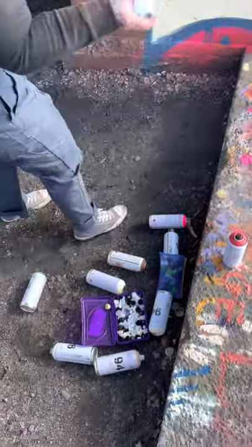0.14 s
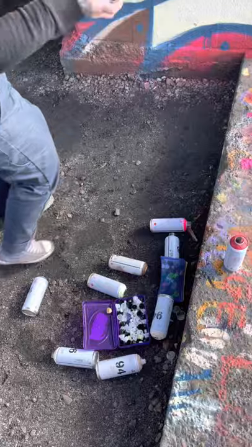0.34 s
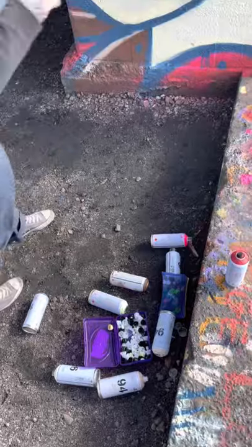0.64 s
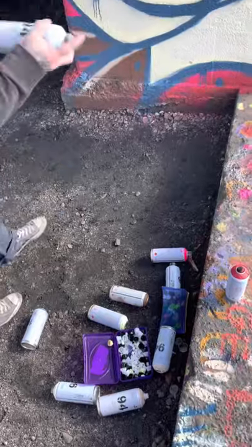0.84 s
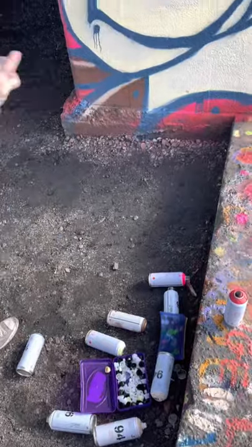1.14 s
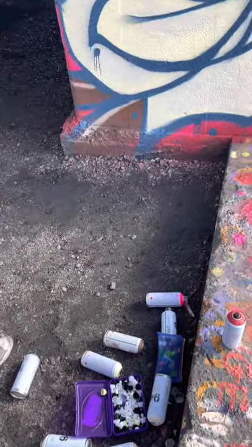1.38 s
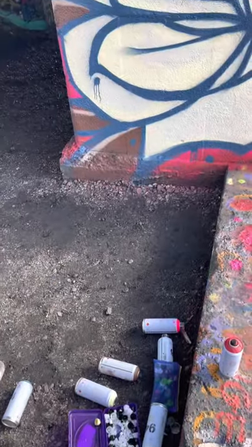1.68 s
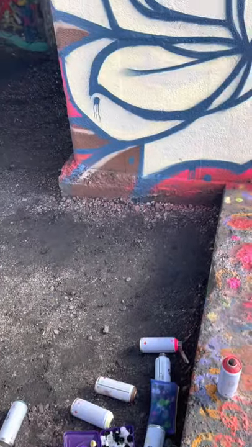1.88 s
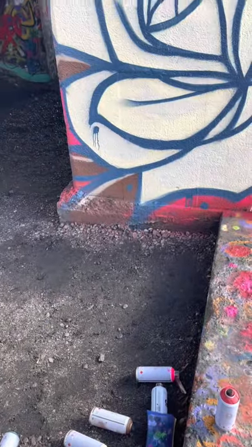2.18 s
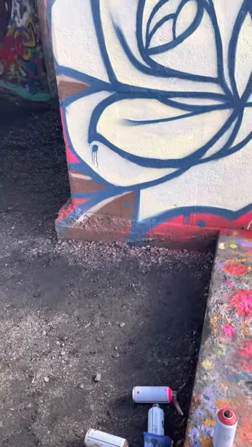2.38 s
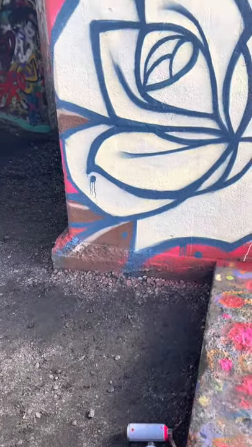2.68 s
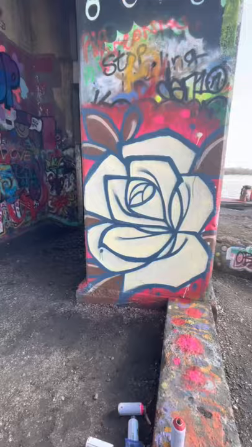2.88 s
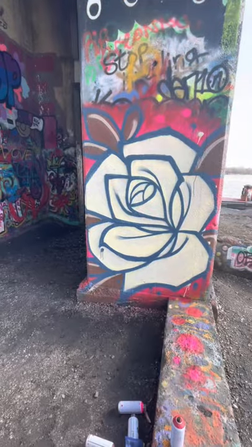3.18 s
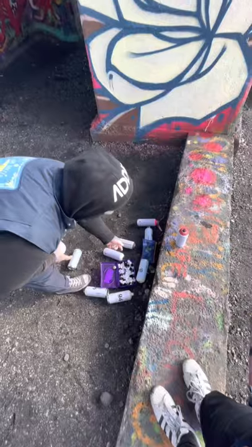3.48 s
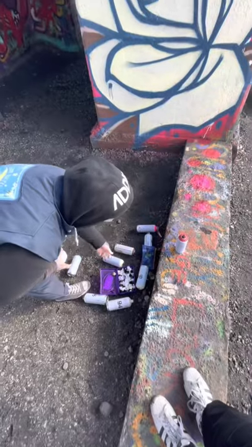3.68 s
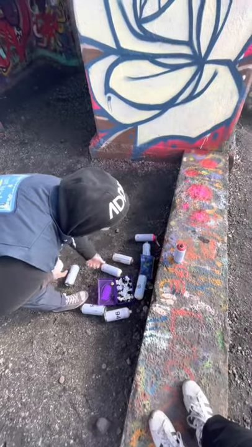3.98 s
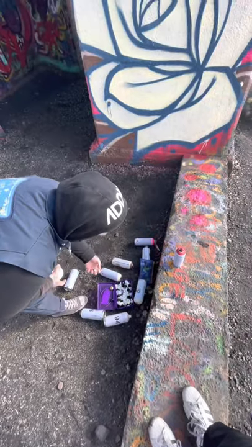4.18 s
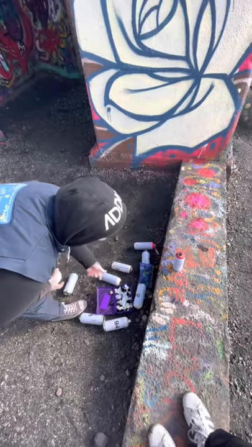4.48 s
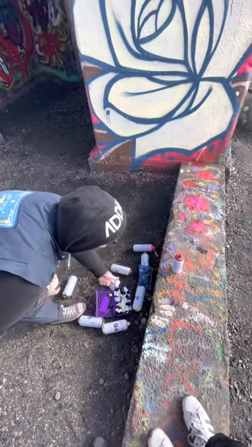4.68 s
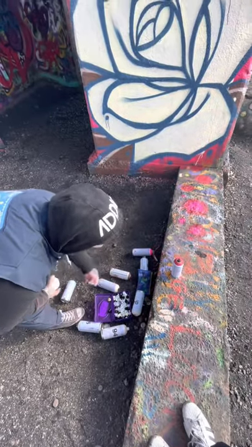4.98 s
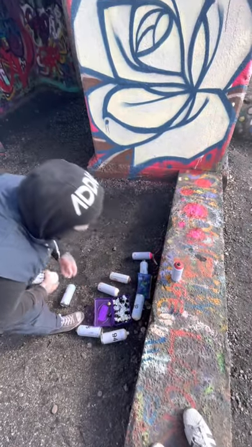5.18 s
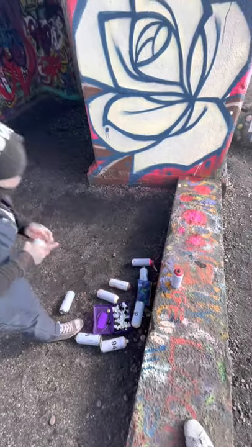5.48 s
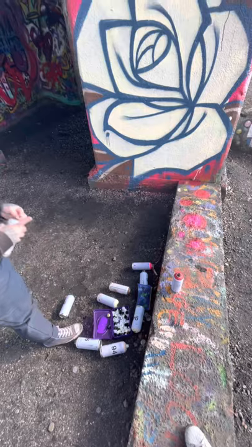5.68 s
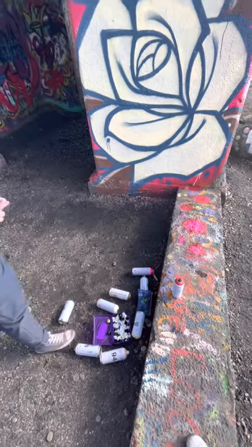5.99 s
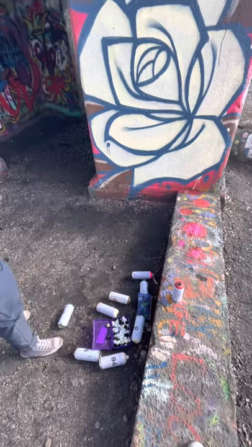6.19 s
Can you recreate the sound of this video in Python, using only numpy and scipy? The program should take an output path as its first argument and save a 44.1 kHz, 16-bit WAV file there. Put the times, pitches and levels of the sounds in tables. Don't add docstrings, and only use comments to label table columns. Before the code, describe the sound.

From 0 to about 2.85 s a steel paint can is shaken hard: its mixing ball hits the shell in sharp, bright, irregular clicks, often in tight clusters of two to five, densest up to about 1.2 s and looser after 2.2 s. Each hit is very short, with a grainy echo from concrete around it. Wind puffs and pops over the phone's stereo microphones. The sound dips and cuts at 2.87 s to quiet wind, thin hiss and distant town hum. A second cut at 3.39 s opens on a clatter of cans and caps, with hollow thuds and short rings near 3.45 and 3.56 s. Sparse ticks follow, with firmer knocks around 4.79 s, and small clusters near 5.8 and 5.9 s. Faint gravel scuffs flicker beneath. Wind grows brisker, with strong pops near 4.1, 5.15 and 5.4 s, continuing to the end at 6.3 s. Bass is thin.

```python
import sys
import numpy as np
from scipy import signal
from scipy.fft import rfft, irfft
from scipy.io import wavfile
from scipy.ndimage import uniform_filter1d

SR = 44100
rng = np.random.default_rng(int(sys.argv[2]) if len(sys.argv) > 2 else 0)


def wav_record(signal):
    frames = np.transpose(np.atleast_2d(signal))
    bounded = np.clip(frames, -1, 1)
    quanta = np.round(bounded * 32767).astype(np.int16)
    wavfile.write(sys.argv[1], SR, quanta)


def volts_from_decibels(level):
    exponent = np.asarray(level, float) / 20
    return 10 ** exponent


N = 279594
T = np.arange(N) / SR
PATCHY_DB, PATCHES_PER_S = 2, 30


def curve(table, column=1):
    return np.interp(T, [r[0] for r in table], [r[column] for r in table])


def colour(x, points):
    hz, db = np.transpose(points)
    f = np.arange(N // 2 + 1) * SR / N + 1
    return irfft(rfft(x) * volts_from_decibels(np.interp(np.log(f), np.log(hz), db)), N)


def unit(x):
    return x / np.sqrt(np.mean(x ** 2))


def walk(rate):
    hold = int(SR / rate)
    steps = np.repeat(rng.standard_normal(N // hold + 1), hold)
    return unit(uniform_filter1d(uniform_filter1d(steps, hold), hold)[:N])


def add(out, s, db, hz, length, turn):
    k = np.arange(-192, 192)
    t = k / SR
    bell = np.exp(-.5 * (t / length[:, None]) ** 2)
    wave = volts_from_decibels(db)[:, None] * bell * np.cos(2 * np.pi * (hz[:, None] * t + turn[:, None]))
    np.add.at(out, np.clip((s * SR).astype(int)[:, None] + k, 0, N - 1), wave)


def placed(s, db, place):
    fall_db = 9
    away = 1 - np.cos(2 * np.pi * (place[:, None] - np.arange(3)) / 3)
    return np.c_[s, db[:, None] - fall_db * away]


# start in seconds, dome, wall and ball level in dB, wall pitch in Hz.
STROKES = [(0.1337, -21, -10, -6.5, 8000), (0.1517, -12, -14.0, -27, 7200), (0.17, -23.0, -25.5, -21, 5780),
           (0.1767, -22, -9.5, -39.0, 5800), (0.2457, -11.5, -13.5, -11, 7700),
           (0.3136, -5.5, -8.5, -8, 6640), (0.319, -26, -4.5, -24.5, 6040), (0.3258, -8, -20.5, -25, 5920),
           (0.3566, -14, -5, -4, 6050), (0.362, -10.5, 0, -18.0, 6500), (0.4641, -11.5, -10, -2.5, 7840),
           (0.4687, -39, -29, -16, 7620), (0.5438, -12, -8.5, -3, 6250), (0.547, -15, -6.5, -8.5, 6040),
           (0.551, -13.5, -12, -30, 7330), (0.6682, -11, -26, -9, 8400), (0.6828, -11.5, -19, -5.5, 5820),
           (0.7117, -18, -24, -19.5, 5450), (0.8097, -11, -5, -9, 5100), (0.8155, -21, 0, -8, 5200),
           (0.823, -28.5, -10, -18, 7100), (0.8315, -12, -15, -6.5, 6130), (0.8395, -54, -5.5, -22, 6050),
           (0.9166, -9, -14, -14, 6050), (0.9244, -34.0, -42, -16, 6000), (0.9418, -17, -26.5, -13, 7100),
           (1.0113, -19.5, -14.5, -26, 6220), (1.0569, -10, -3, -19.5, 6790), (1.06, -17, -9.5, -10, 6560),
           (1.0673, -27, -6, -12, 5700), (1.0768, -22, -5, -3, 7350), (1.0852, -56, -6.5, -19, 6300),
           (1.1048, -53, -17.5, -16, 6880), (1.1764, -11.5, -10, -9, 8050), (1.183, -26, -19, -13, 5800),
           (1.184, -37, -31, -18, 7370)]
# start in seconds, dome, wall and ball level in dB, wall pitch in Hz.
LATER_STROKES = [(1.2036, -24, -25.0, -15, 8170), (1.303, -12.5, -19.5, -16, 6510),
                 (1.3141, -26, -3.5, -8.5, 7800), (1.324, -19, -10.5, -15.0, 6200),
                 (1.3419, -22, -20, -20.0, 6300), (1.4239, -17, -13, -12, 7800), (1.4305, -7, -22, -15, 8010),
                 (1.4356, -13, -23, -16, 7760), (1.4808, -18, -20, -20.5, 5570),
                 (1.5345, -14.5, -3.5, -11.5, 8000), (1.5362, -4.5, -6, -21, 5230), (1.545, -26, -14, -17, 6520),
                 (1.5722, -23, -3, -8, 7580), (1.5818, -37, -18, -14.5, 7900), (1.6776, -9.5, -26, -25.0, 6000),
                 (1.6825, -19, -23, -13, 7720), (1.751, -10.5, -12.5, -15, 5600),
                 (1.8517, -21.5, -13, -25, 6210), (1.856, -15, -15.5, -43, 5780), (1.8746, -13, -13, -22, 7630),
                 (1.9566, -20, -17, -13.5, 5670), (1.961, -8, -27, -27, 6950), (1.9867, -13.5, -24, -17.5, 6200),
                 (2.0488, -9, -12, -15, 7140), (2.0959, -15, -8, 0, 6100), (2.0993, -38, -23, -25, 8280),
                 (2.1013, -14, -8.5, -18, 5820), (2.105, -29, -13, -19, 7900), (2.1994, -6, -23.5, -23, 5500),
                 (2.21, -21.5, -12.5, -12.5, 5630), (2.2986, -9, -4, -33, 5700),
                 (2.4263, -10, -12.5, -12.5, 7950), (2.565, -14.5, -7.5, -11, 6500),
                 (2.5714, -27, -3.5, -18.5, 5400), (2.6567, -15.5, -19.5, -18, 6350),
                 (2.781, -10.5, -3.5, -11.5, 5200)]
# start in seconds, level in dB, place (0 dome, 1
PLACED_HITS = [(0.055, -18.5, 0.49), (1.766, -22, 2), (1.835, -17.5, 1.06), (1.881, -22.5, 0.2),
               (3.3957, -26, 1.77), (3.4318, -23, 1), (3.4383, -24, 0.53), (3.459, -29, 2.0), (3.6764, -35, 1.4),
               (3.989, -40, 2.9), (3.854, -27.5, 0.36), (3.871, -33, 0.2), (4.8314, -27, 3.5),
               (4.9305, -21, 0.33), (5.8847, -21, 2.4), (6.051, -24.5, 2.5)]
# start in seconds, dome, wall and ball level in dB.
TICKS = [(3.401, -54, -21, -24), (3.447, -33, -21, -10), (3.451, -17, -11, -7), (3.49, -31, -21, -17),
         (3.5372, -52, -50, -23), (3.5593, -48, -21, -17), (3.5646, -22, -13.5, -24),
         (3.668, -23, -28, -22), (3.6945, -29, -37, -31), (4.419, -45, -39, -33.5),
         (4.7869, -15.5, -22, -10), (4.795, -41, -29, -19), (4.812, -18.5, -48, -44),
         (4.923, -31, -37, -25), (5.116, -33, -29, -22.5), (5.192, -27.5, -41, -32),
         (5.4693, -53, -41, -30.5), (5.7881, -17.5, -27, -10.5), (5.796, -25, -16.5, -12),
         (5.801, -31, -24, -19), (5.806, -39, -19, -17), (5.881, -29, -22, -22.5), (5.9287, -19, -29, -17),
         (6.017, -21, -54, -22), (6.077, -32, -29.5, -39)]


def strikes(body_db=-9):
    shaking = np.array(STROKES + LATER_STROKES)[:, :4]
    rows = np.r_[shaking, placed(*np.transpose(PLACED_HITS)), TICKS]
    return rows[:, 0], np.c_[rows[:, 1:], rows[:, 1] + body_db].T


# pitch in Hz, scatter in Hz, length in seconds.
MODE_GROUPS = [
    (4280, 630, 0.00022),
    (6130, 3300, 0.00022),
    (10320, 740, 0.00029),
    (1700, 930, 0.00036),
]


def clicks(crack_db=-12):
    out = np.zeros(N)
    s, levels = strikes()
    wall_hz = np.array(STROKES + LATER_STROKES)[:, 4]
    caps = s > CUTS[0][0]
    soft = np.where(caps, 1.7, 1)
    cap_db = -5 * caps
    stutter_db = -25 + 9 * caps
    stutter_s = (-0.0015, 0.006)
    for touch_db, (early, late) in [(0, (0, 0)), (stutter_db, stutter_s), (stutter_db - 3, stutter_s)]:
        main = late == 0
        at = s + rng.uniform(early, late, len(s))
        group_db = levels + touch_db + cap_db * main
        for k, (db, (hz, scatter_hz, length)) in enumerate(zip(group_db, MODE_GROUPS)):
            chance = rng.uniform(-0.83, 1, (len(s), 3)).T
            pitch = hz + scatter_hz * chance[0]
            if k == 1 and main:
                pitch[:len(wall_hz)] = wall_hz
            add(out, at, db, pitch, length * soft * (1 + .3 * chance[1]), chance[2])
    crack = levels.mean(axis=0) + crack_db - 20 * caps
    add(out, s, crack, 0 * s + 6000, 0 * s + .00007, rng.random(len(s)))
    return out


SHELL_HZ = [
    [3740, 5000, 5200],
    [5000, 5400, 6060, 7000],
    [10500, 10600, 11500],
]


def shell():
    level_db, t60_s, scatter_db = -20, 0.0083, -3
    out = 0
    s, levels = strikes()
    keep = volts_from_decibels(-60 / (t60_s * SR))
    for db, group in zip(levels, SHELL_HZ):
        for hz in group:
            push, turn = np.zeros(N), 2 * np.pi * hz / SR
            push[(s * SR).astype(int)] = volts_from_decibels(db + level_db + scatter_db * rng.standard_normal(len(s)))
            out = out + signal.lfilter([0, np.sin(turn)], [1, -2 * keep * np.cos(turn), keep ** 2], push)
    return out


# start in seconds, thud in dB, ring in Hz, ring in dB, ring t60 in seconds.
KNOCKS = [(3.4527, -2.5, 1790, -32, 0.16), (3.481, -20.5, 1700, -31, 0.15), (3.511, -25, 1700, -32, 0.072),
          (3.858, -47, 1750, -41.5, 0.28), (3.5602, -16, 1750, -16, 0.079), (3.668, -27.5, 1764, -31, 0.14),
          (4.7904, -9.5, 1890, -53, 0.092), (4.7952, -6, 2234, -29, 0.12), (4.9235, -28, 2080, -28, 0.093),
          (5.116, -29, 2070, -33.5, 0.042), (5.194, -24.5, 2130, -28, 0.084),
          (5.691, -51, 2020, -18.5, 0.028), (5.928, -45, 2290, -35, 0.086)]
# ratio to the ring, level in dB.
BODY = [(0.456, -5), (.7, -3.5), (.92, -1), (1.13, -3.5), (1.35, -10)]


def knocks():
    out = np.zeros(N)
    s, db, hz, ring_db, t60 = np.transpose(KNOCKS)
    for ratio, mode_db in BODY:
        chance = rng.uniform(-1.53, 1, (len(s), 3)).T
        pitch = hz * ratio * (1 + 0.0021 * chance[1])
        add(out, s + 0.00098 * chance[0], db + mode_db - 7.5, pitch, 0 * s + 0.0016, chance[2])
    rough = volts_from_decibels(3 * walk(300))
    for at, f, level, decay in zip(s, hz, ring_db, t60):
        on = slice(int(at * SR), int(at * SR) + SR // 3)
        t = T[on] - T[on][0]
        twin = 0.63 * (f < 1950)
        beat = 1 - twin + twin * np.cos(2 * np.pi * 45 * t)
        ring = np.exp(-np.log(1000) * t / decay) * np.sin(2 * np.pi * f * t)
        out[on] += volts_from_decibels(level) * ring * beat * rough[on] * np.minimum(t / 0.00092, 1)
    return out


# t60 in seconds, level under the strike in dB.
BAY = [
    (0.08, -13),
    (.45, -23.5),
]


def bay_power(s, db):
    power, out = np.zeros(N), 0
    np.add.at(power, (s * SR).astype(int), volts_from_decibels(2 * db))
    cut = int(CUTS[0][0] * SR)
    for t60, share_db in BAY:
        keep = volts_from_decibels(-120 / (t60 * SR))
        parts = [signal.lfilter([1], [1, -keep], part) for part in (power[:cut], power[cut:])]
        out = out + volts_from_decibels(2 * share_db) * np.concatenate(parts)
    return out


EARLIER_DB = [
    -16.5,
    -60,
    -10.5,
    -42,
]
# frequency in Hz, level in dB.
BAY_COLOUR = [(500, -28), (1500, -1), (2900, -7), (4300, -5), (6500, -8), (8500, -2.5), (10600, -4),
              (11600, -7), (12400, -36), (17000, -86)]


def bay(knock_db=-3, width=0.57):
    out = 0
    s, levels = strikes()
    s, levels = np.r_[0, s], np.c_[EARLIER_DB, levels]
    powers = [bay_power(s, db) for db in levels]
    knock = np.array(KNOCKS)
    powers[-1] += bay_power(knock[:, 0], knock[:, 1] + knock_db)
    grit = walk(500)
    for power, (hz, *_) in zip(powers, MODE_GROUPS):
        skirt = [(-4, -40), (-1, -4), (0, 0), (1, -4), (4, -40)]  # (widths from the centre, dB)
        band = [(hz * 2 ** (k * width), db) for k, db in skirt]
        grain_db = 2.4 * np.minimum(grit + walk(600), 2) + PATCHY_DB * walk(PATCHES_PER_S)
        out = out + unit(colour(rng.standard_normal(N), band)) * np.sqrt(power) * volts_from_decibels(grain_db)
    return colour(out, BAY_COLOUR)


# start in
# seconds, level in dB, # pitch in Hz.
POPS = [(0.0595, -27, 850), (0.0885, -12.5, 1080), (0.124, -22.5, 804), (0.1423, -15, 800),
        (0.1912, -26, 920), (0.2037, -20, 1490), (0.2202, -20.5, 755), (0.6793, -21.5, 766),
        (0.851, -27, 600), (0.876, -17.5, 1570), (1.1265, -22, 1650), (1.194, -43, 756),
        (1.226, -21.5, 567), (1.294, -14.5, 620), (1.3836, -18.5, 1590), (1.402, -21, 457),
        (1.4532, -17.5, 420), (1.477, -13, 590), (1.53, -18.5, 660), (1.572, -18, 593),
        (1.744, -22.5, 666), (1.891, -18, 1700), (2.0021, -17, 1030), (2.0416, -8.5, 660),
        (2.1564, -20.5, 706), (2.238, -22, 630), (2.344, -19.5, 714), (2.3768, -21, 660),
        (2.5109, -18, 680), (2.83, -19.5, 550),
        (3.9138, -25, 570), (4.0595, -14.5, 880), (4.108, -9, 1030), (4.347, -17.5, 1110),
             (4.408, -22, 885), (4.6552, -20, 1057), (4.7322, -38, 1053), (4.9134, -23, 860),
             (4.9819, -15.5, 1050), (5.0198, -15.5, 890), (5.075, -34, 1010), (5.085, -18.5, 835),
             (5.154, -11, 1050), (5.1763, -18, 1010), (5.256, -18.5, 1030), (5.2603, -19, 1140),
             (5.2903, -19, 1130), (5.3052, -18, 1120), (5.352, -20.5, 1040), (5.416, -7.5, 1110),
             (5.487, -22, 890), (5.545, -22.5, 950), (5.5934, -15.5, 1350), (5.7621, -30, 1030),
             (5.8567, -23.5, 850), (5.9372, -22, 1050), (5.953, -22.5, 1170), (5.9872, -15, 1500),
             (6.144, -17.5, 1790), (6.1716, -23, 1310),
        (0.098, -20, 815), (0.146, -18, 675), (0.1882, -18.5, 1700), (0.467, -19, 1810),
              (1.14, -20, 1530), (1.1834, -16, 1440), (1.1864, -20, 865), (1.3118, -14.5, 2020),
              (1.3683, -20.5, 1680), (1.427, -15, 1970), (1.4675, -20.5, 580), (1.562, -21, 935),
              (1.629, -21.5, 1600), (1.8, -22, 620), (1.908, -23, 1500), (1.957, -13, 1630),
              (2.131, -25.5, 1600), (2.213, -15, 1560), (2.219, -24.5, 650), (2.2938, -22.5, 570),
              (2.5395, -20.5, 630), (2.663, -24, 1500), (3.856, -28.5, 900), (3.947, -34, 535),
              (4.054, -26, 670), (4.1528, -29, 645), (4.172, -22, 810), (4.32, -24, 770), (4.333, -23, 816),
              (4.4, -21.5, 1500), (4.472, -27.5, 855), (4.4968, -24.5, 914), (4.696, -25, 990),
              (4.724, -22.5, 1070), (4.7707, -23, 804), (4.812, -13.5, 1500), (4.8243, -22, 1730),
              (4.8438, -22.5, 950), (4.869, -26, 1100), (4.9047, -23, 1240), (4.9182, -23.5, 810),
              (4.9579, -22, 720), (5.0262, -26, 730), (5.056, -30, 1000), (5.302, -24, 960),
              (5.3862, -23, 775), (5.504, -22, 1280), (5.562, -29, 1070), (5.574, -22, 880),
              (5.617, -30, 1090), (5.744, -23, 870), (5.7842, -21.5, 1060)]


def pops():
    return np.transpose(POPS)


# time in seconds, buffeting in dB.
GUST = [(0, -43.5), (.35, -38), (.56, -63), (.84, -31), (1.0, -51), (1.13, -33.5), (1.45, -44.5),
        (1.67, -50), (2.0, -38), (2.8, -39), (2.95, -60), (3.36, -42.5), (4.0, -40), (4.15, -36.5),
        (4.9, -39.5), (5.27, -46), (5.55, -42.5), (6.33, -34)]
# centre in seconds, buffeting in dB, half length in seconds.
SQUALLS = [(0.126, -33, 0.022), (0.827, -41, 0.061), (1.292, -27, 0.0039), (1.437, -33, 0.022),
           (2.005, -33.5, 0.057), (2.564, -45, 0.038), (6.15, -59, 0.016), (4.105, -27, 0.019),
           (4.21, -32.5, 0.046), (0.02, -33.5, 0.0062), (0.204, -42, 0.014), (1.759, -38.5, 0.012),
           (4.044, -39.5, 0.011), (4.17, -38, 0.012), (4.345, -33, 0.0054), (4.411, -29, 0.012),
           (4.47, -42, 0.005), (4.65, -44, 0.014), (4.729, -33.5, 0.0039), (4.844, -36, 0.023),
           (4.972, -32.5, 0.014), (5.081, -30, 0.011), (5.254, -37.5, 0.014), (5.545, -45, 0.03),
           (5.015, -29.5, 0.0049), (5.939, -37.5, 0.015), (6.04, -40.5, 0.012), (6.168, -31, 0.0038),
           (6.33, -40, 0.038), (4.548, -33.5, 0.02), (5.994, -34, 0.025)]
# time in seconds, pitch of a typical eddy in Hz.
EDDY_HZ = [(0, 786), (.7, 550), (2.8, 640), (3.9, 730), (4.2, 786), (6.34, 967)]


def eddies():
    per_s, lull_db, lulls_per_s, top_hz = 1100, 6.5, 90, 2300
    halo_db, halo_s, halo_follow = -21.5, 0.0053, 0.73
    swell_db, swell_s = -19, 0.012
    clumps, rush, halo = np.zeros(N), np.zeros(N), np.zeros(N)
    chance = rng.random((int(per_s * N / SR), 4)).T
    at = (chance[0] * (N - 1)).astype(int)
    hz = curve(EDDY_HZ)[at] * 2 ** (1.75 * (chance[1] - .45))
    lull = lull_db * np.minimum(walk(lulls_per_s), 1)[at]
    add(clumps, at / SR, -3 * np.log(1.02 - chance[2]) + lull, hz, 0.33 / hz, chance[3])
    add(rush, at / SR, -3 * np.log(1.02 - chance[3]), 1.218 * hz, 0.34 / hz, chance[2])
    clumps, rush = colour(np.array([clumps, unit(rush)]), [(top_hz, 0), (2 * top_hz, -30)])
    clumps = unit(clumps)

    s, db, _ = pops()
    halo[(s * SR).astype(int)] = volts_from_decibels(2 * (db.mean() + halo_follow * (db - db.mean())))
    lag = abs(np.arange(-8192, 8193)) / SR
    spread = volts_from_decibels(2 * halo_db) * np.exp(-lag / halo_s) + volts_from_decibels(2 * swell_db) * np.exp(-(lag / swell_s) ** 2)
    halo = signal.fftconvolve(halo, spread, "same")
    gust = np.sqrt(volts_from_decibels(2 * curve(GUST) - 8.5) + abs(halo))
    squall = np.sqrt(sum(volts_from_decibels(2 * db) * np.exp(-((T - s) / length) ** 2) for s, db, length in SQUALLS))
    mid = clumps * gust + rush * squall
    side = clumps[::-1] * gust + rush[::-1] * squall
    return mid, side


def wind(edge_db=-10, apart_db=-8):
    s, db, hz = pops()
    chance = rng.random((len(s), 4)).T
    mid, side = eddies() * volts_from_decibels(np.array([[0], [apart_db]]))
    add(mid, s, db, hz, (0.45 + 0.23 * chance[0]) / hz, chance[1])
    add(mid, s, db + edge_db, 1.675 * hz, 0.5 / hz, chance[3])
    add(side, s, db - 36.0, hz, (.5 + .3 * chance[0]) / hz, chance[2])
    return np.array([mid + side, mid - side])


# time in seconds, level in dB.
HISS = [(2.96, -62.5), (3.2, -74.5), (3.26, -56), (3.4, -67.5), (3.44, -67), (3.6, -56.5), (3.8, -70),
        (3.87, -72.5), (4.2, -65.5), (4.27, -61.5), (4.4, -70.5), (4.7, -74.5), (5.0, -66), (5.45, -66),
        (5.62, -62.5), (6.05, -59.5), (6.2, -68.5), (6.33, -65.5)]
# frequency in Hz, level in dB.
HISS_COLOUR = [(2000, 8.5), (2600, 5.5), (3200, -2.5), (5000, -0.5), (7500, -2), (10800, 4.5), (11700, -6),
               (12600, -18), (17000, -76)]
# frequency in Hz, level in dB.
TOWN = [(150, -8), (700, -0.5), (1100, -0.5), (2300, -22), (4000, -45), (9000, -34), (12000, -70)]


def hiss(town_db=-48):
    scuff = 0
    for hz in 2000 * 2 ** np.arange(0, 3.5, .5):
        edges = [(hz / 2, -30), (hz / 1.2, 0), (hz * 1.2, 0), (hz * 2, -30)]
        band = colour(rng.standard_normal(N), edges)
        scuff = scuff + band * volts_from_decibels(PATCHY_DB * walk(PATCHES_PER_S))
    scuff = unit(colour(scuff, HISS_COLOUR)) * volts_from_decibels(curve(HISS) + 12.5 + walk(22.26))
    town = unit(colour(rng.standard_normal(N), TOWN)) * volts_from_decibels(town_db + walk(9.3))
    return scuff + town


# frequency in Hz, lead of the left in radians.
PORTS = [(0, 0), (3500, .5), (4600, 1.7), (5250, 4.8), (5900, 6.28), (6300, 6.28), (8300, 9.3), (9600, 9.5),
         (11700, 12.3), (17000, 13)]


def ports(x, sign):
    hz, lead = np.transpose(PORTS)
    lag = np.exp(.5j * np.interp(np.arange(N // 2 + 1) * SR / N, hz, lead))
    return np.array([irfft(rfft(x) * lag, N), sign * irfft(rfft(x) / lag, N)])


# frequency in Hz, level in dB.
APART = [(300, -13), (1200, -14), (2400, -2), (5000, -8), (6000, -13), (9000, -13), (13000, -12)]


def scene():
    shared = clicks() + shell() + knocks() + bay() + hiss()
    apart = colour(bay() + hiss(), APART) * volts_from_decibels(6 * (T > CUTS[0][0]))
    return ports(shared, 1) + ports(apart, -1) + wind()


# time in seconds, edge in Hz.
LOW_CUT = [(0, 450), (.45, 295), (.8, 194), (1.1, 300), (1.17, 166), (1.8, 184), (1.9, 310), (2.84, 255),
           (2.88, 490), (3.15, 164), (4.1, 163.5), (4.2, 274), (4.74, 523), (4.79, 358), (5.3, 380),
           (5.9, 247), (6.05, 584), (6.34, 705)]


def wind_filter(x):
    f, t, spec = signal.stft(x, SR, nperseg=2048)
    edge = np.interp(t, *np.transpose(LOW_CUT))
    spec = spec * (volts_from_decibels(-46) + 1 / (1 + (edge / (f[:, None] + 1)) ** 12))
    spec = spec / (1 + (f[:, None] / 13800) ** 14)
    return signal.istft(spec, SR, nperseg=2048)[1][:, :N]


# time in seconds, fade out in seconds, fade in in seconds.
CUTS = [
    (2.865, 0.047, 0.017),
    (3.393, 0.034, 0.0023),
]


def scene_changes(x):
    for s, out_s, in_s in CUTS:
        x = x * np.clip(np.maximum((s - T) / out_s, (T - s) / in_s), .08, 1)
    return x


# low edge in Hz, high edge in Hz,
# channel (0 mid, 1 side), memory in seconds, share of time lost before and after the first change.
DROPS = [(8000, 8450, 0, .3, .12, .2), (8450, 9000, 0, .14, .55, .2), (9000, 9600, 0, .14, .62, .12),
         (9600, 10150, 0, .5, .15, .75), (5700, 6400, 1, .3, .3, .3), (11350, 11800, 0, .3, .05, .4),
         (11800, 12500, 0, 1.5, .45, .75), (12500, 22000, 0, 1.5, .82, .9), (11600, 22000, 1, 6, .85, .85)]


def band_dropouts(x):
    f, t, spec = signal.stft(np.array([x[0] + x[1], x[0] - x[1]]) / 2, SR, nperseg=1024)
    before, after = t < CUTS[0][0], t > CUTS[0][0]
    for lo, hi, side, memory_s, early, late in DROPS:
        band = (f >= lo) & (f < hi)
        power = np.sum(abs(spec[side, band]) ** 2, axis=0)
        level = np.log(uniform_filter1d(power, size=2) + 1e-18)
        level -= uniform_filter1d(level, int(memory_s / t[1]))
        floor = np.where(before, np.quantile(level[before], early), np.quantile(level[after], late))
        spec[side, band] *= level > floor
    mid, side = signal.istft(spec, SR, nperseg=1024)[1][:, :N]
    return np.array([mid + side, mid - side])


def top_cut(x):
    return signal.sosfilt(signal.butter(12, 16780, fs=SR, output="sos"), x)


def record(dry):
    x = wind_filter(np.tanh(1.153 * dry) / 1.322)
    x = x + 0.035 * uniform_filter1d(x ** 2, size=64)
    mix = band_dropouts(scene_changes(x))
    return top_cut(mix)


dry = scene()
out = record(dry)
wav_record(out)
```